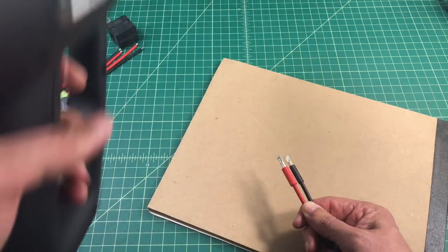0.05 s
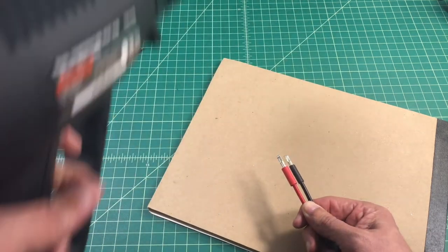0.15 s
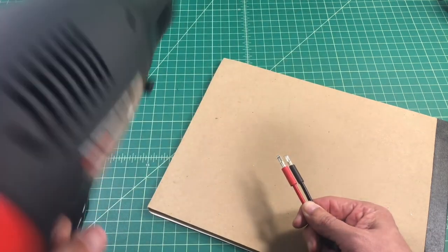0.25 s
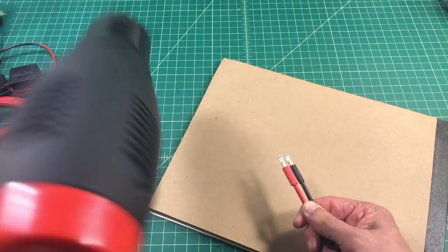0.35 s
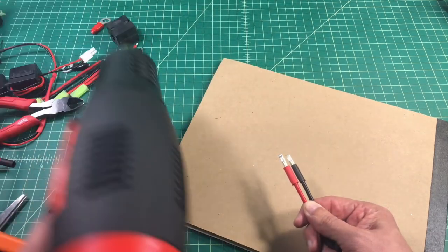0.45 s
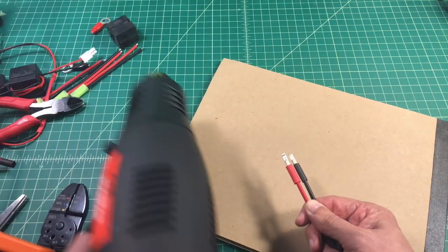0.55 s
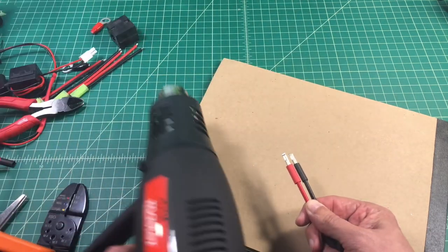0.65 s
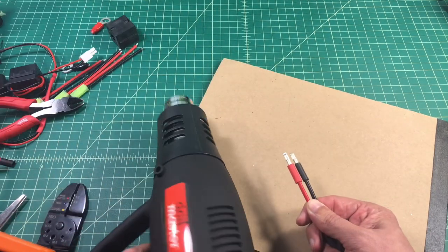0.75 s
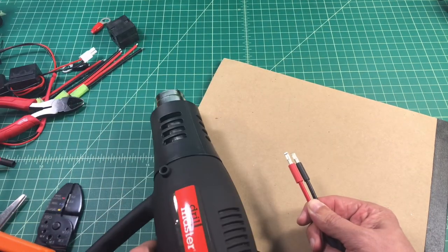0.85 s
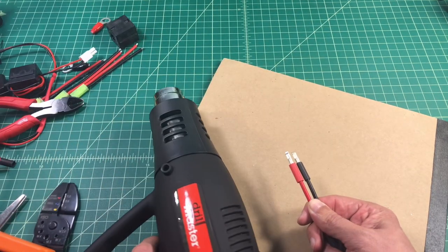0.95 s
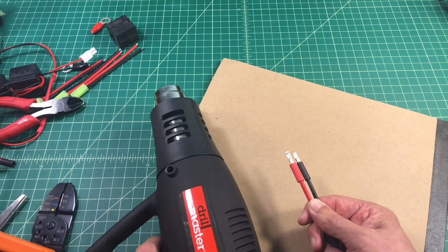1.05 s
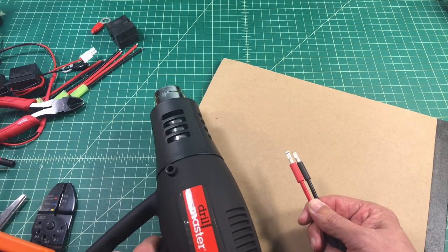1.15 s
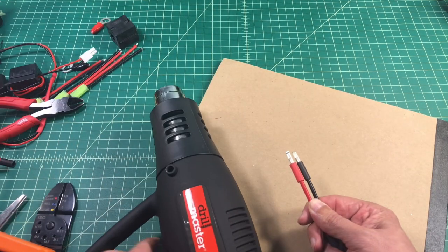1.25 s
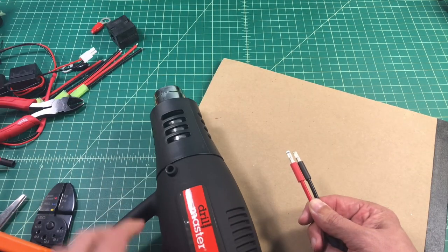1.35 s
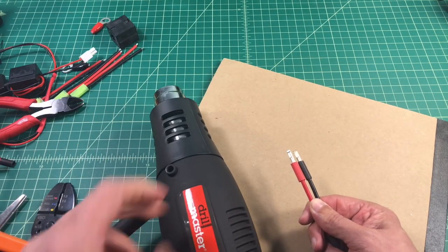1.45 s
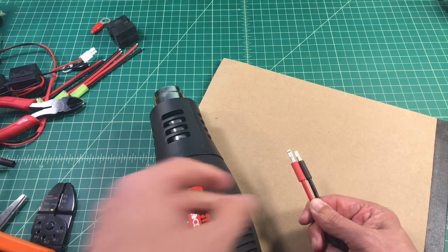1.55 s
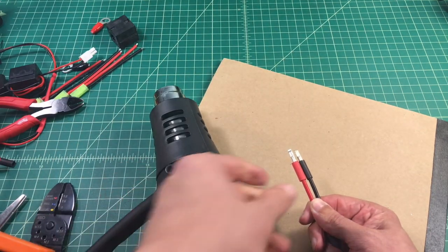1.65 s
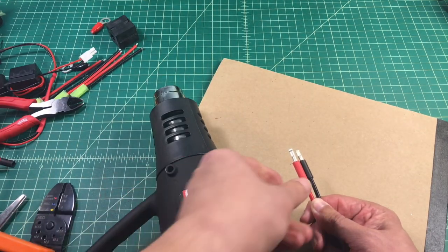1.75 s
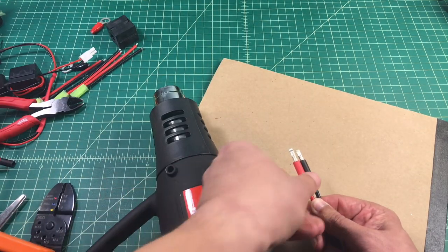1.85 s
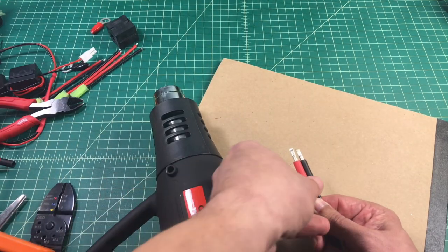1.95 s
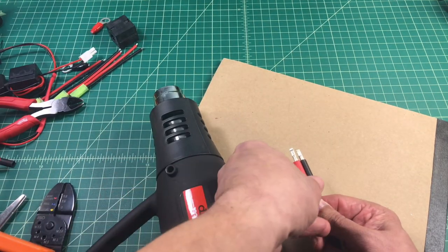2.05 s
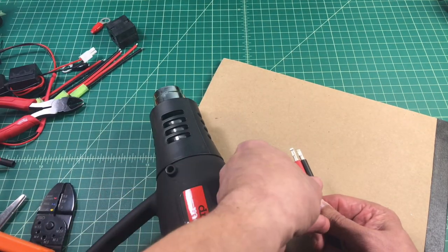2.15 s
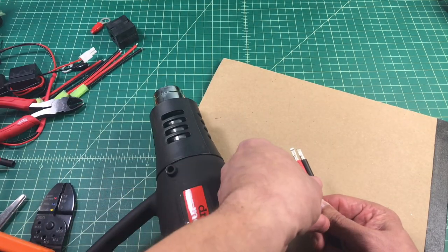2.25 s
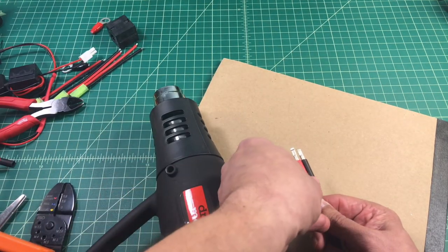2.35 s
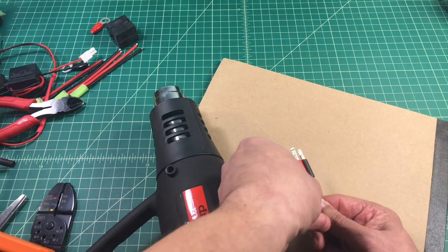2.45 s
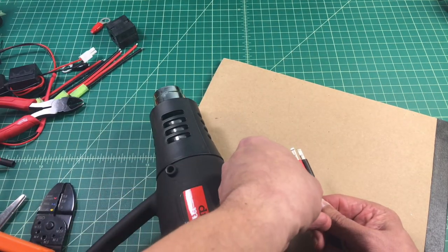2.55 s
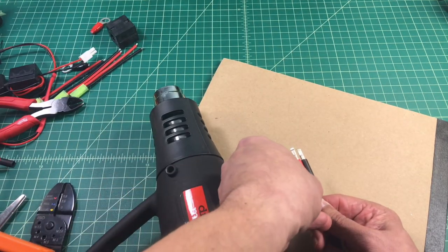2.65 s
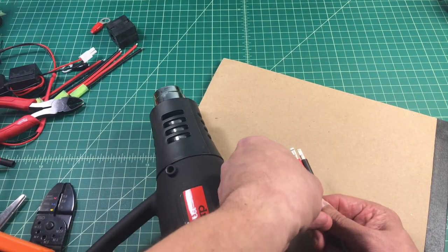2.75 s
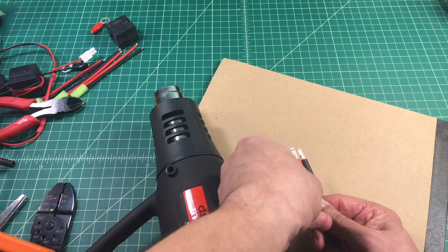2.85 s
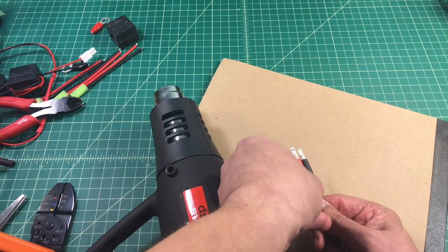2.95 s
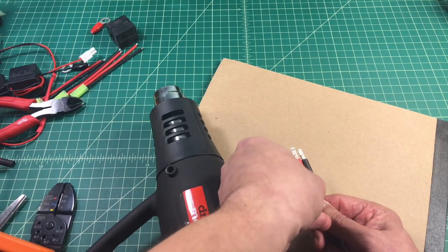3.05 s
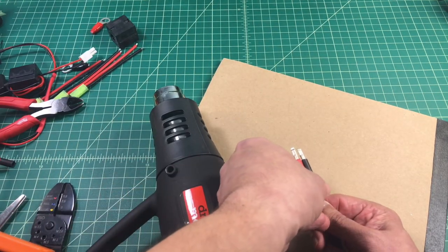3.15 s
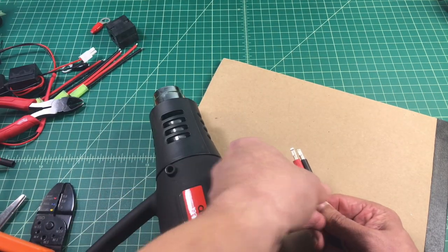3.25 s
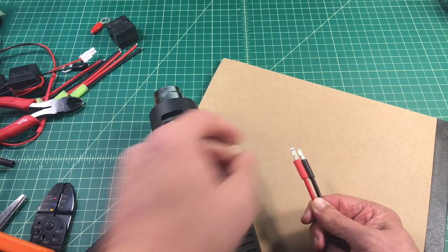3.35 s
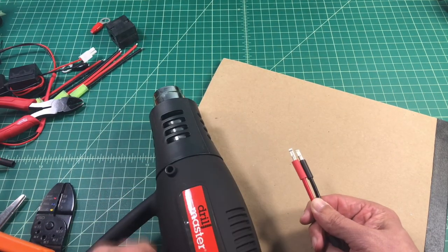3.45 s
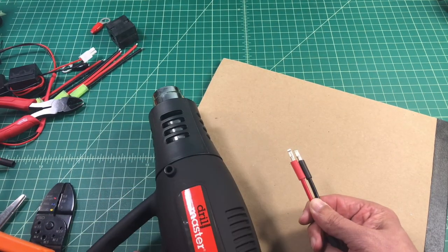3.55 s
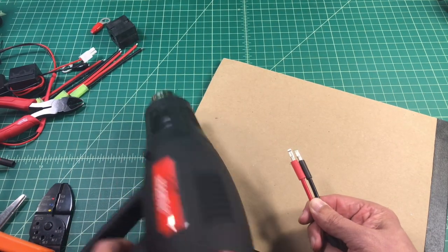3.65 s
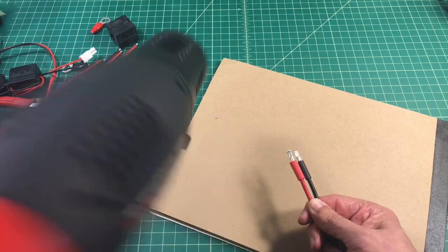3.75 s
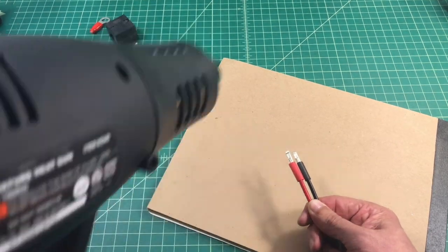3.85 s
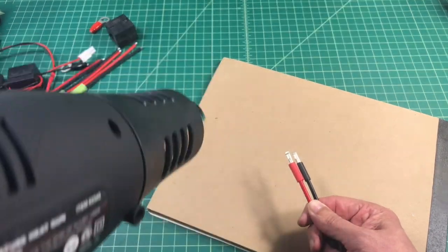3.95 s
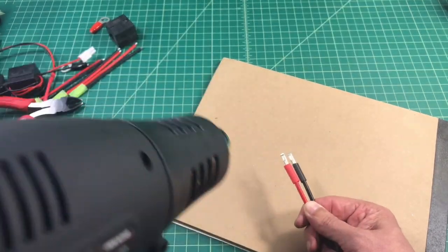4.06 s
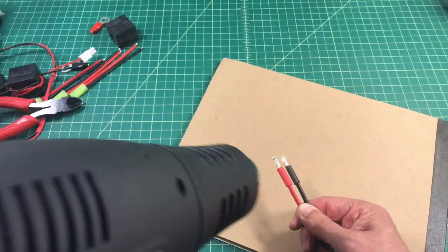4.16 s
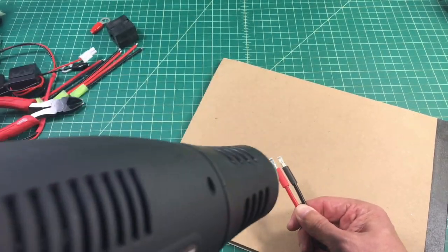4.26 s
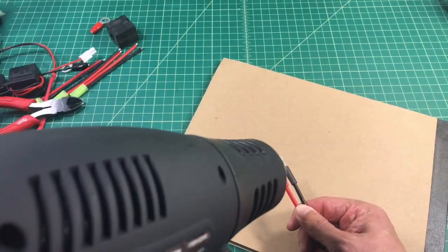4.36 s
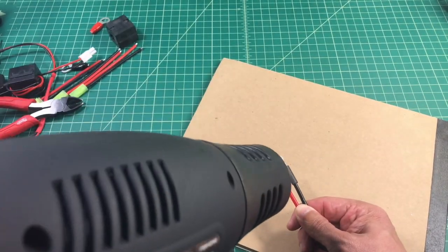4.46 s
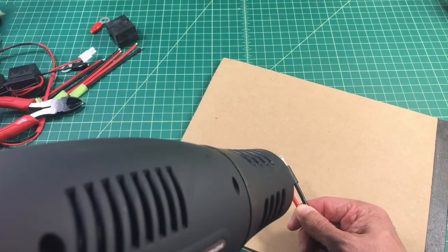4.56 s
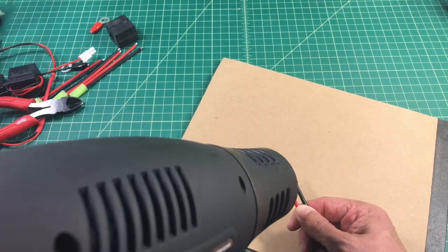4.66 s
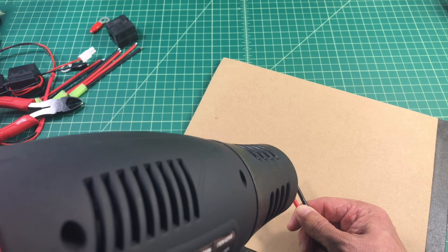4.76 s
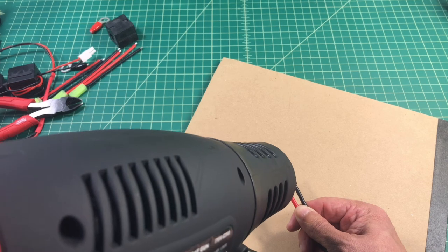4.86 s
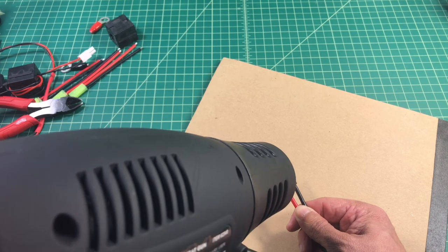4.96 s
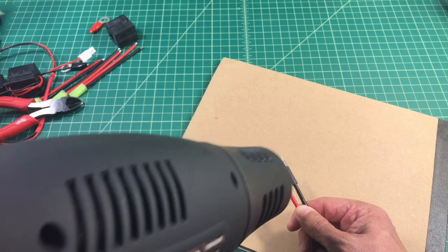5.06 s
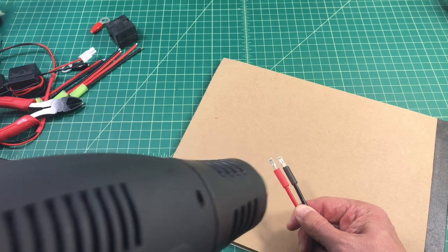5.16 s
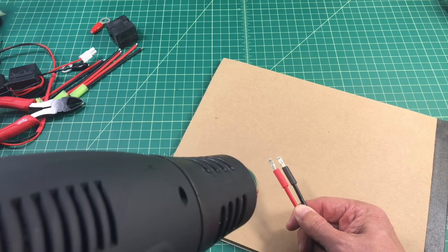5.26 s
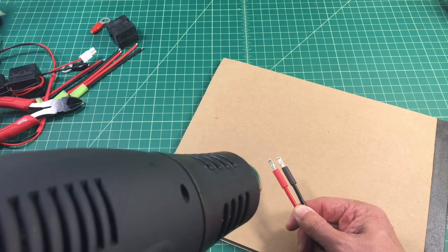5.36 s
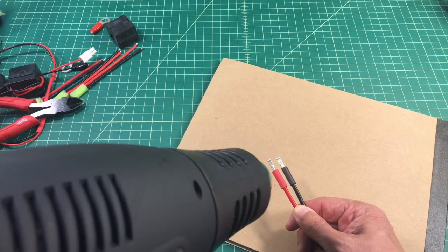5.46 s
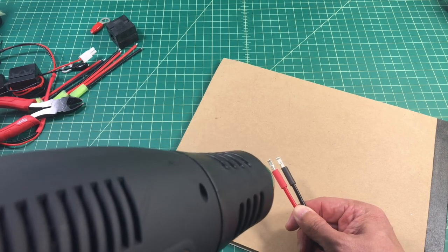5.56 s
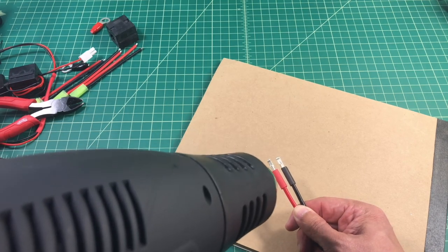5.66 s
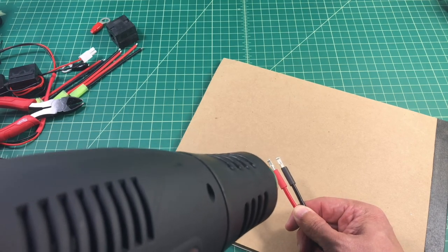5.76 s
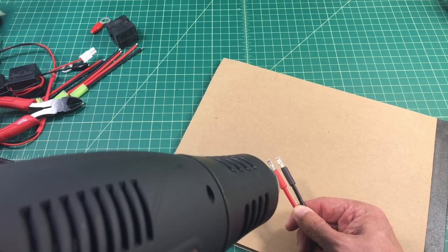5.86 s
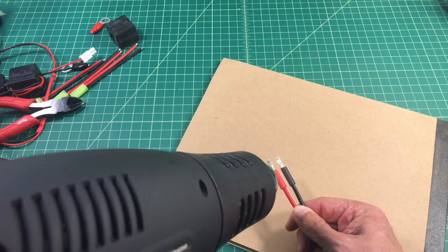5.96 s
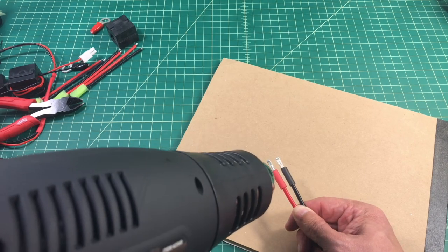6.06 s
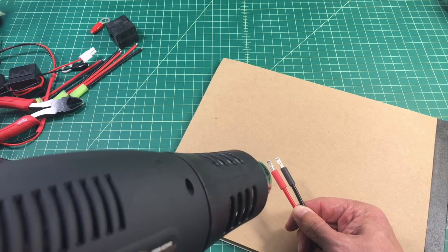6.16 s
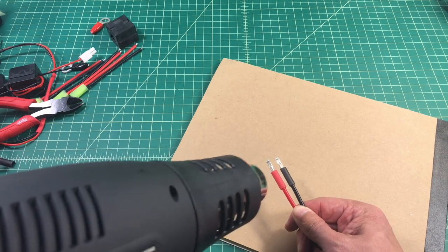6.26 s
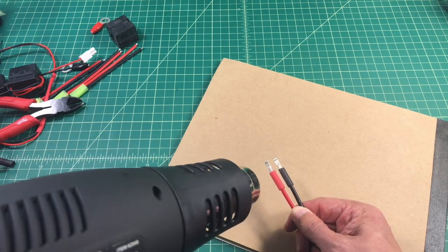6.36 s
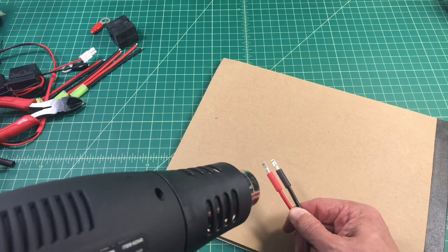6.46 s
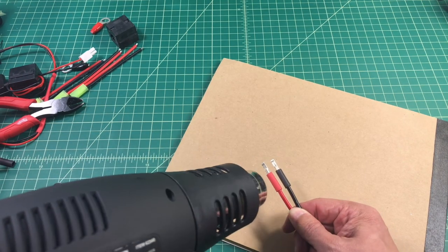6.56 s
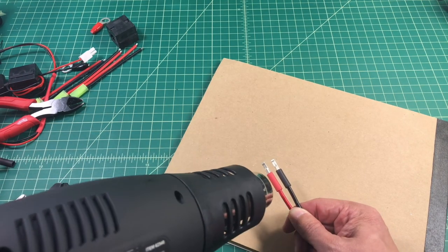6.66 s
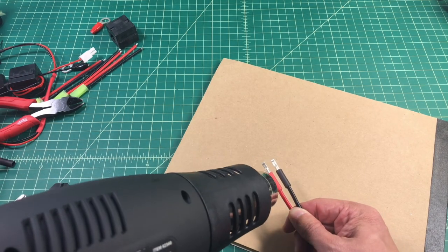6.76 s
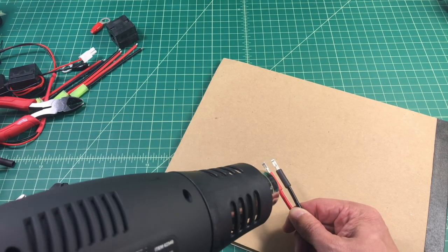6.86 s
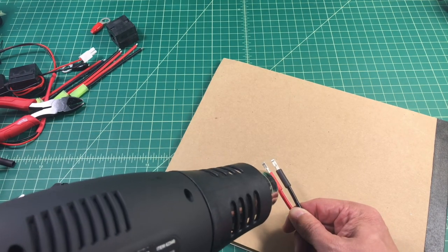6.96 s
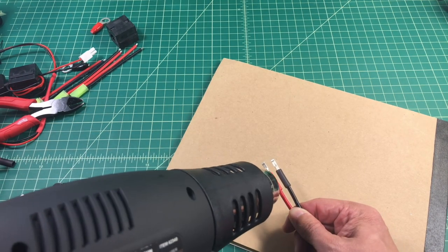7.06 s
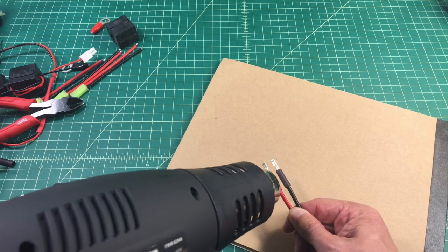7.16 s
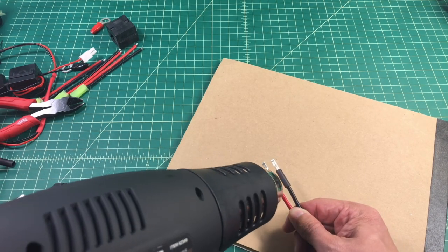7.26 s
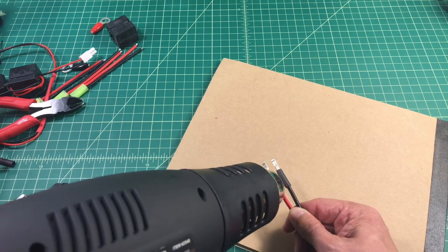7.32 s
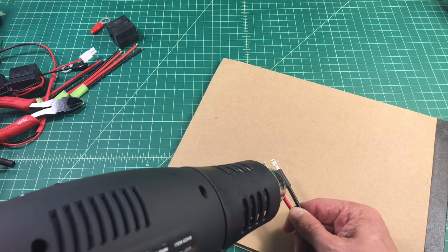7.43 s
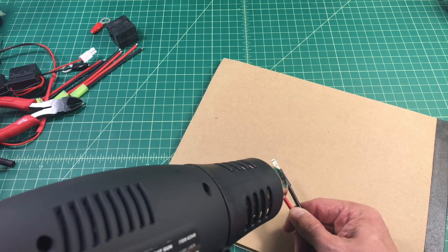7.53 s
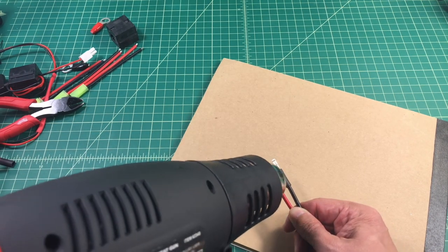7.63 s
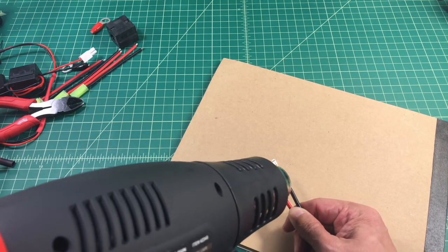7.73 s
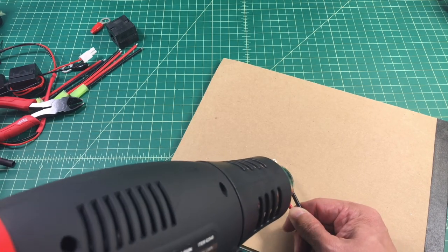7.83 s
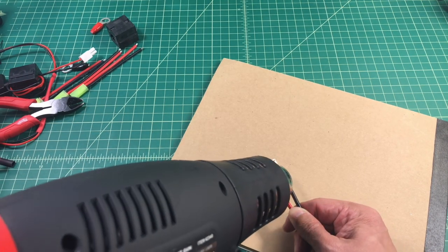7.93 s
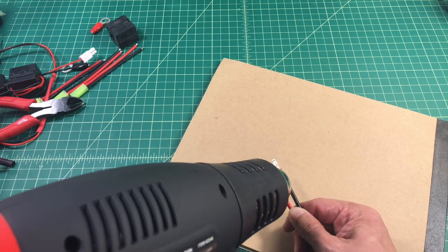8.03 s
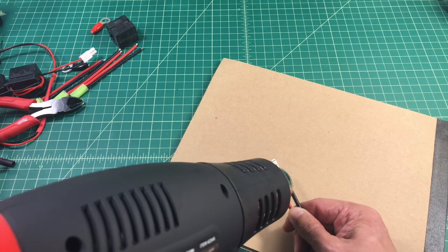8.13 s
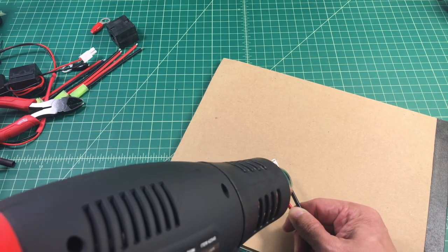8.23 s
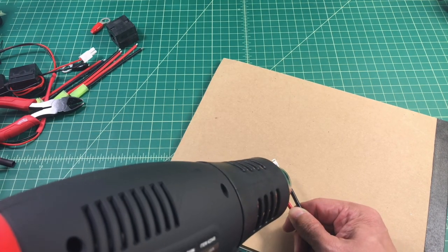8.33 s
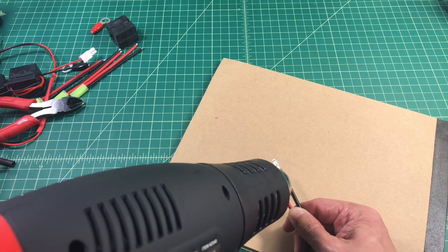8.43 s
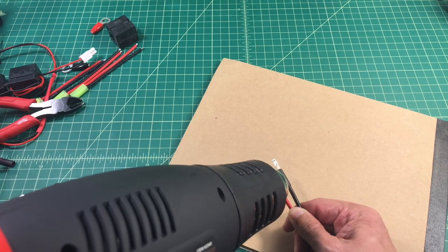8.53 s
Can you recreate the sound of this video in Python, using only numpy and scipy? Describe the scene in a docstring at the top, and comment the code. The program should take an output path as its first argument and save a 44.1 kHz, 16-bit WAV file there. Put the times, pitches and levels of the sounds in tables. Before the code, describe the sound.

Close handling scuffs and bench thuds, near silence, pickup knocks, then a heat gun clicks on and blows loudly with a fan whine.

```python
"""Heat gun on a workbench

A heat gun is handled, put down on a workbench, picked up and switched on close to a microphone.
Rubs are filtered noise in uneven grains, knocks are decaying modes, clicks are short bands of noise.
One shaft speed drives both the whine (sines at multiples of the blade rate) and the rushing air
(noise shaped by the housing); tilting the gun changes the colour of both. A quiet room hums underneath."""
import sys
import numpy as np
from scipy import signal
from scipy.fft import rfft, irfft, next_fast_len
from scipy.io import wavfile
from scipy.ndimage import uniform_filter1d

SR = 44100
rng = np.random.default_rng(int(sys.argv[2]) if len(sys.argv) > 2 else 0)


def generate_wav(signal):
    """Clip the signal to [-1, 1] and save it as 16-bit WAV at the path in sys.argv[1]."""
    frames = np.transpose(np.atleast_2d(signal))
    scaled = np.clip(frames, -1, 1) * 32767
    pcm = np.round(scaled).astype(np.int16)
    wavfile.write(sys.argv[1], SR, pcm)


N = 378819
T = np.arange(N) / SR
SIZE = next_fast_len(N, real=True)
HZ = np.maximum(np.fft.rfftfreq(SIZE, 1 / SR), 1)

# room hum: (frequency [Hz], level with the rumble [dB], level after it [dB])
HUM_TONES = [(58.3, -64.5, -75), (91.9, -65.5, -70), (119.8, -73.5, -68), (182, -88, -71),
             (239.5, -78.5, -74)]
# room noise with its deep rumble: (frequency [Hz], relative level [dB])
RUMBLY_SPECTRUM = [(13, -40), (22, -5), (55, -5.5), (99, -16.5), (200, -26), (330, -29), (500, -27.5),
                   (750, -33), (1100, -34), (2200, -39), (5300, -42.5), (6000, -45.5), (12400, -51.5),
                   (15500, -62)]
# room noise without it: (frequency [Hz], relative level [dB])
CALM_SPECTRUM = [(13, -49), (25, -30), (60, -1), (120, 0), (200, -5), (350, -10), (700, -13.5), (950, -8),
                 (1500, -15.5), (2800, -23.5), (6600, -22.5), (15500, -33)]
RUMBLE_ENDS_S, RUMBLY_DB, CALM_DB = 3.35, -57, -64

# skin on the plastic housing: (frequency [Hz], relative level [dB])
GRIP_SPECTRUM = [(60, -30), (160, -8), (400, -10.5), (750, -9.5), (1200, -16), (2500, -19), (3600, -25),
                 (5000, -29.5), (7600, -40), (13000, -43), (15500, -50)]
# hollow resonances of the hand-held housing: (frequency [Hz], width [Hz], gain [dB])
HOLLOW_MODES = [(557, 75, 9.5), (1530, 220, 8), (2070, 100, 7), (2600, 290, 7.5), (3330, 280, 9.5)]
# strokes of the palm: (time [s], length [s], level before trim [dB], brightness [dB per octave])
PALM_STROKES = [(0, 0.038, -53.5, 0), (0.042, 0.064, -46.5, -0.5), (0.096, 0.092, -47, -0.7),
                (0.153, 0.18, -60.5, 1.5), (0.291, 0.055, -54, -2.5), (0.293, 0.21, -55, 2),
                (.45, 0.12, -53.5, 0), (0.546, 0.095, -54.5, 0.9), (0.558, 0.43, -58.5, 0.3)]
# fingers brushing wire, mat and handle: (time [s], length [s], level [dB], brightness [dB per octave])
FINGER_BRUSHES = [(0.02, 0.14, -58.5, -0.5), (0.326, 0.43, -66, -5), (1.04, 0.07, -67, 1),
                  (1.117, 0.08, -60, 1), (1.8, .06, -71, 3), (1.869, 0.091, -65.5, 3),
                  (3.295, 0.35, -63, 0.1), (3.6, 0.14, -65, 3.5)]
# colour of the brushing: (frequency [Hz], relative level [dB])
BRUSH_SPECTRUM = [(200, -16), (600, 1.5), (1100, 8.5), (1800, 0), (3300, 0), (3900, -11), (4800, -0.5),
                  (6000, -5.5), (7000, -9), (12000, -7), (16000, -22)]
# resonances of the brushed handle: (frequency [Hz], width [Hz], gain [dB])
HANDLE_MODES = [(1130, 100, 4), (4700, 400, 3), (6870, 200, 4)]

# modes of the gun on the bench: (frequency [Hz], relative level [dB], 60 dB decay time [s])
BENCH_MODES = [(104, 3.5, 0.22), (167.4, 1.5, 0.22), (301, -2, 0.077), (387, -2, 0.12), (515, -3.5, 0.054),
               (700, -0.5, 0.034), (897, -5, 0.037), (1043, -2, 0.038), (1210, -10.5, 0.05),
               (1553, 0, 0.026), (2240, 0.5, 0.039)]
# knocks: (time [s], peak level [dB], centre of the blow [Hz], spread [octaves])
BLOWS = [(.297, -39, 1500, 0.36), (0.617, -44.5, 500, 1.3), (0.787, -52, 450, .8), (0.878, -41.5, 330, .7),
         (0.9203, -31.5, 820, 0.66), (.931, -52, 800, 0.53), (.982, -34, 390, 0.67), (.993, -32, 308, 0.74),
         (2.593, -44.5, 1210, .3), (3.589, -53, 400, 1.0), (3.63, -41.5, 580, 1.03),
         (3.688, -39, 1320, 0.63), (3.693, -39, 200, 1)]
# plastic clicks, the last two being the rocker switch:
# (time [s], peak level [dB], centre [Hz], 60 dB decay time [s])
PLASTIC_CLICKS = [(0.036, -44, 5900, 0.029), (0.037, -40.5, 2280, 0.04), (.297, -53, 2490, 0.024),
                  (0.922, -47.5, 2980, 0.049), (0.979, -52, 3200, 0.25), (2.498, -51, 2960, 0.01),
                  (2.592, -50.5, 4000, 0.022), (2.702, -55, 1500, 0.025), (3.508, -39.5, 4170, 0.038),
                  (3.687, -38.5, 5000, .03), (3.688, -43.5, 1900, .05), (3.781, -55, 5500, 0.015),
                  (3.9675, -25.5, 5570, 0.0039), (3.97, -24.5, 5200, 0.015)]
# thin squeaks: (time [s], length [s], highest pitch [Hz], level at the middle [dB])
SQUEAK_EVENTS = [(1.427, .05, 5120, -77), (1.71, 0.071, 5530, -73), (1.805, 0.055, 5170, -74),
                 (1.855, 0.088, 5360, -77), (4.055, 0.054, 5280, -43.5)]
SQUEAK_BASE_HZ = 4800

# how the gun is held: (time [s], tilt [0 = side-on, 1 = nozzle turned away and down])
GUN_TILT = [(5.2, 0.27), (6.1, 0.3), (6.5, 1)]
# turbulence: (frequency [Hz], relative level side-on [dB], relative level tilted [dB])
AIR_SPECTRA = [(30, -51, -45), (70, -42, -23), (192, -29, -22.5), (426, -21, -16), (1007, -9, -8.5),
               (1724, -1.5, 0), (2890, -10, -14), (4500, -6.5, -9), (6860, -13.5, -16), (9970, -16, -13),
               (15500, -22.5, -23)]
# resonances and notches of the housing and vents:
# (frequency [Hz], width [Hz], gain side-on [dB], gain tilted [dB])
DUCT_MODES = [(205, 29, -3, -1.5), (305, 46, 4, 5), (754, 62, 8, 7.5), (889, 100, -6, -6),
              (1151, 186, -3, -6.5), (1380, 78, -3.5, -3.5), (1760, 54, 7.5, 4), (1983, 133, -2.5, 5.5),
              (2146, 62, -9, -7), (2620, 280, -8, 2), (2790, 150, 0, 4), (2932, 100, 4.5, 0),
              (3250, 70, 7, 1.5), (3364, 106, -19, -5), (4187, 99, 6, 7.5), (5000, 170, 1.5, 5),
              (5310, 130, 8.5, 4), (5555, 260, -14.5, 8.5), (6140, 140, -2, -7), (6050, 590, -4.5, 1),
              (6600, 220, 3, 2.5), (7350, 290, -1.5, 9), (8340, 150, 2.5, -2), (8730, 230, -1, 5),
              (9940, 540, -1.5, -11), (11480, 240, -6, -4), (12030, 570, 4.5, -6)]
# fan partials, shaped by the duct and swelling at times:
# (multiple of blade rate, level side-on before trim [dB], level tilted before trim [dB])
FAN_PARTIALS = [(1, -43, -45.3), (2, -65.5, -62), (6, -40, -55), (12, -52, -48.5), (20, -56.5, -57)]
# a partial's beam sweeps over the microphone:
# (middle time [s], length [s], multiple of blade rate, gain [dB])
BEAM_SWELLS = [(4.2, .2, 12, 9), (4.26, .24, 20, 5), (4.7, .7, 20, 5), (5.09, 0.47, 2, 12),
               (5.796, 1.64, 2, 13), (5.837, 0.37, 20, 8), (6.113, 0.51, 12, 3.5), (6.49, .5, 20, 10.5),
               (7.85, 0.85, 20, 6.5), (8.197, 2.9, 6, 5)]
# motor partials, wavering:
# (multiple of blade rate before rounding, level side-on before trim [dB], level tilted before trim [dB])
MOTOR_ORDERS = [(3, -54, -51.5), (3.99, -54, -58), (4.99, -51.5, -56.5), (7.01, -54, -56.5),
                (8, -54, -56.5), (9, -58, -52), (10, -49.5, -49.5), (11.13, -65, -60), (15, -52.5, -50.5),
                (15.97, -53, -58), (17.96, -64, -57), (18.97, -54, -63), (20.9, -63, -59), (21.8, -71, -67),
                (22.8, -68, -68), (24.2, -64, -69), (24.8, -67, -64), (26, -63, -64), (27, -66, -67),
                (28, -65, -66), (29, -63, -66), (30, -52, -69), (31, -62, -64), (32.2, -51, -70)]

# the motor is switched on at SWITCH_ON_S, runs up quickly, then creeps to full speed as it warms; RUN_UP_S and
# CREEP_S are time constants
SWITCH_ON_S, BLADE_HZ = 3.97, 494.3
RUN_UP_HZ, RUN_UP_S, CREEP_HZ, CREEP_S = 444, 0.08545, 15.96, 1.073
# air level at full speed, its growth as a power of speed, and the loss while the gun swings in
FLOW_DB, FLOW_POWER, FAR_DB, APPROACH_S = -32.8, 1.6, -2.0, 0.87
# the blade tone grows with this power of speed, its multiples with a steeper one
TONE_POWER, PARTIALS_POWER = 2.6, 4.1
TOP_HZ = 15750


def undb(db):
    """Amplitude ratio: 20 dB is a factor of ten."""
    return 10 ** (np.asarray(db) / 20)


def colour(points, axis=1):
    """Spectral envelope: one dB column interpolated along log frequency."""
    points = np.array(points, float)
    return np.interp(np.log(HZ), np.log(points[:, 0]), points[:, axis])


def resonances(modes):
    """Resonance: a bell-shaped peak or notch in dB around each mode's frequency."""
    return sum(db * np.exp(-2 * ((HZ - hz) / width) ** 2) for hz, width, db in modes)


def noise(db):
    """Spectral shaping: white noise filtered to the given dB spectrum, at rms 1."""
    x = irfft(rfft(rng.standard_normal(SIZE)) * undb(db), SIZE)[:N]
    return x / x.std()


def walk(rate):
    """Random fluctuation: smoothed steps of spread 1, about rate of them per second."""
    size = max(int(SR / rate), 1)
    steps = np.repeat(rng.standard_normal(N // size + 1), size)[:N]
    x = uniform_filter1d(uniform_filter1d(steps, size), size // 2 + 1)
    return x / x.std()


def arch(s, length):
    """Envelope: half a sine from 0 up to 1 and back, starting at time s; 0 outside."""
    out = np.zeros(N)
    inside = (T > s) & (T < s + length)
    out[inside] = np.sin(np.pi * (T[inside] - s) / length)
    return out


def add(out, s, sound, db):
    """Superposition: mix a short sound in at time s with the given peak level."""
    i = max(int(s * SR), 0)
    scaled = undb(db) * sound / np.abs(sound).max()
    out[i:i + len(sound)] += scaled[:N - i]


def room(waver_db=2.0):
    """Ambient noise: wavering hum over broadband noise whose deep rumble gives way to a calmer one."""
    calm = np.clip((T - RUMBLE_ENDS_S) / 0.014, 0, 1)
    hum = np.zeros(N)
    for hz, rumbly_db, calm_db in HUM_TONES:
        db = rumbly_db + calm * (calm_db - rumbly_db) + waver_db * walk(2.91)
        hum += np.sqrt(2) * undb(db) * np.sin(2 * np.pi * hz * T)
    rumbly_noise = undb(RUMBLY_DB) * noise(colour(RUMBLY_SPECTRUM))
    calm_noise = undb(CALM_DB) * noise(colour(CALM_SPECTRUM))
    return hum + (1 - calm) * rumbly_noise + calm * calm_noise


def handling(trim_db=-1.5, grain_db=1.0, shift_db=1.5, fullness=0.61):
    """Stick-slip friction: skin excites the hollow plastic in uneven grains, the palm damping modes by turns."""
    out, octaves = np.zeros(N), np.log2(HZ)
    shell = colour(GRIP_SPECTRUM)
    hollow = np.zeros(N)
    for mode in HOLLOW_MODES[1:]:
        # the lowest mode sounds along with each of the others
        ringing = noise(shell + resonances([HOLLOW_MODES[0], mode]))
        hollow += ringing * undb(shift_db * walk(13.5))
    hollow_spectrum = rfft(hollow, SIZE)
    for s, length, level_db, bright in PALM_STROKES:
        rub = irfft(hollow_spectrum * undb(bright * octaves), SIZE)[:N]
        out += undb(level_db + trim_db) * arch(s, length) ** fullness * rub / rub.std()
    handle = colour(BRUSH_SPECTRUM) + resonances(HANDLE_MODES)
    for s, length, level_db, bright in FINGER_BRUSHES:
        out += undb(level_db) * arch(s, length) * noise(handle + bright * octaves)
    return out * undb(grain_db * walk(160))


def knocks(rise_s=0.00019):
    """Modal excitation: a blow wakes modes near its own pitch, soft ones the bench, hard ones the housing."""
    out, t = np.zeros(N), T[:SR // 2]
    for s, db, centre_hz, spread in BLOWS:
        ring = np.zeros(len(t))
        for k, (hz, mode_db, t60) in enumerate(BENCH_MODES):
            nearness = np.exp(-0.5 * (np.log2(hz / centre_hz) / spread) ** 2)
            decay = undb(mode_db - 60 * t / t60)
            ring += (-1) ** k * nearness * decay * np.sin(2 * np.pi * hz * t)  # alternating polarity
        add(out, s, ring * (1 - np.exp(-t / rise_s)), db)
    return out


def clicks(band_ratio=1.4, tail_db=-30, tail_s=0.24):
    """High modal density: the plastic shell cracks as a band of decaying noise with a faint room tail."""
    out, t = np.zeros(N), T[:SR // 4]
    for s, db, hz, t60 in PLASTIC_CLICKS:
        crack = np.exp(-np.log(1000) * t / t60)
        tail = undb(tail_db) * np.exp(-np.log(1000) * t / tail_s)
        shell = signal.butter(1, [hz / band_ratio, hz * band_ratio], "band", fs=SR, output="sos")
        add(out, s, signal.sosfilt(shell, (crack + tail) * rng.standard_normal(len(t))), db)
    return out


def walls(x, wet_db=-15, t60=0.5, dull_hz=2500):
    """Reverberation: convolution with decaying, low-passed noise adds a small room's dull tail."""
    t = T[:SR // 2]
    tail = rng.standard_normal(len(t)) * np.exp(-np.log(1000) * t / t60) * (t > 0.006)
    dull = signal.butter(1, dull_hz, fs=SR, output="sos")
    tail = signal.sosfilt(dull, tail / np.linalg.norm(tail))
    return x + undb(wet_db) * signal.fftconvolve(x, tail)[:N]


def squeaks(rough=0.0112, flicker_db=1.5):
    """Frequency modulation: pitch and level arch together, faint on the tubing, louder as the motor starts."""
    out, scatter = np.zeros(N), 1 + rough * walk(400)
    for s, length, top_hz, db in SQUEAK_EVENTS:
        push = arch(s, length)
        hz = (SQUEAK_BASE_HZ + (top_hz - SQUEAK_BASE_HZ) * push) * scatter
        out += np.sqrt(2 * push) * undb(db) * np.sin(2 * np.pi * np.cumsum(hz) / SR)
    return out * undb(flicker_db * walk(50))


def air(phase, tilt, load, gust_db=0.28, chop=0.065, hiss_hz=6000, slow_dull=0.2):
    """Turbulence: flow noise rings the housing; its hiss grows with speed and is chopped twice per blade."""
    duct = np.array(DUCT_MODES)
    side_db = colour(AIR_SPECTRA, axis=1) + resonances(duct[:, [0, 1, 2]])
    tilted_db = colour(AIR_SPECTRA, axis=2) + resonances(duct[:, [0, 1, 3]])
    rush = np.sqrt(1 - tilt) * noise(side_db) + np.sqrt(tilt) * noise(tilted_db)
    hiss = signal.sosfilt(signal.butter(1, hiss_hz, "high", fs=SR, output="sos"), rush)
    hiss_change = chop * np.sin(2 * phase) - slow_dull * (1 - load)
    return (rush + hiss_change * hiss) * undb(gust_db * walk(13))


def bench_echo(x, swing_m=0.266, settle_s=0.28, sway_m=0.0034, share=0.062):
    """Comb filtering: bench and hand reflect the air; detours shrink as the gun swings in, then sway."""
    swing = swing_m * np.exp(-np.maximum(T - SWITCH_ON_S, 0) / settle_s)
    out = x
    for path_m in (0.3, 0.62, 1.1):
        detour_m = path_m + swing + sway_m * walk(1)
        lag = np.round(detour_m / 343 * SR).astype(int)  # speed of sound 343 m/s
        out = out + share * x[np.maximum(np.arange(N) - lag, 0)]
    return out


def whine(phase, tilt, trim_db=-0.8, waver_db=2.4, flicker_db=1.5, between_db=-68):
    """Phase locking: motor partials locked to the shaft, each wavering and flickering by itself."""
    out = np.zeros(N)
    whole = [(round(k), side_db, tilted_db) for k, side_db, tilted_db in MOTOR_ORDERS]
    # faint partials lie half-way between the highest ones
    between = [(k + 0.5, between_db, between_db) for k in range(24, 32)]
    for k, side_db, tilted_db in whole + between:
        db = side_db + tilt * (tilted_db - side_db) + trim_db
        db = db + waver_db * walk(2.515) + flicker_db * walk(22)
        out += undb(db) * np.sin(k * phase + rng.uniform(0, 2 * np.pi))
    return np.sqrt(2) * out


def fan(phase, hz, tilt, trim_db=0.4, flutter=0.053, duct_share=0.58):
    """Blade-passing tone: it and its multiples climb through the duct resonances, swell and flutter."""
    out = np.zeros(N)
    duct = duct_share * resonances(np.array(DUCT_MODES)[:, :3])
    for k, side_db, tilted_db in FAN_PARTIALS:
        db = side_db + tilt * (tilted_db - side_db) + trim_db
        # duct gain relative to that at full speed
        db = db + np.interp(k * hz, HZ, duct) - np.interp(k * BLADE_HZ, HZ, duct)
        for middle_s, length, multiple, gain_db in BEAM_SWELLS:
            if multiple == k:
                db = db + gain_db * arch(middle_s - length / 2, length)
        drive = (hz / BLADE_HZ) ** (TONE_POWER if k == 1 else PARTIALS_POWER)
        out += drive * undb(db) * (1 + flutter * walk(25)) * np.sin(k * phase)
    return np.sqrt(2) * out


def heat_gun(wobble=0.00032, jitter=0.00043):
    """Common drive: one shaft speed, rising exponentially from switch-on, sets both whine and air."""
    age = np.maximum(T - SWITCH_ON_S, 0)
    hz = BLADE_HZ - RUN_UP_HZ * np.exp(-age / RUN_UP_S) - CREEP_HZ * np.exp(-age / CREEP_S)
    speed = hz / BLADE_HZ
    tilt = np.interp(T, *np.transpose(GUN_TILT))
    flow = speed ** FLOW_POWER * undb(FLOW_DB + FAR_DB * np.exp(-age / APPROACH_S))
    unsteady_hz = hz * (1 + wobble * walk(8) + jitter * walk(60))
    phase = 2 * np.pi * np.cumsum(unsteady_hz) / SR
    tones = fan(phase, hz, tilt) + speed ** PARTIALS_POWER * whine(phase, tilt)
    rush = flow * bench_echo(air(phase, tilt, speed ** TONE_POWER))
    running = np.clip(age / 0.01, 0, 1)  # silent before switch-on
    return running * (tones + rush)


def scene():
    """Superposition: all sources add at one microphone, which feeds both channels."""
    contacts = walls(knocks() + clicks() + handling())
    mono = room() + contacts + squeaks() + heat_gun()
    return np.tile(mono, (2, 1))


def record(dry):
    """Band limiting: a steep elliptic low-pass removes the extreme treble."""
    return signal.sosfilt(signal.ellip(12, 0.1, 80, TOP_HZ, fs=SR, output="sos"), dry)


dry = scene()
out = record(dry)
generate_wav(out)
```